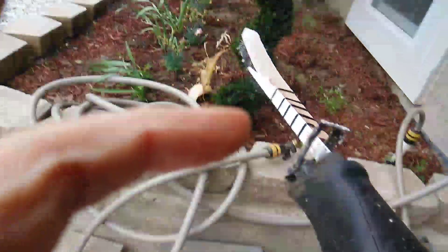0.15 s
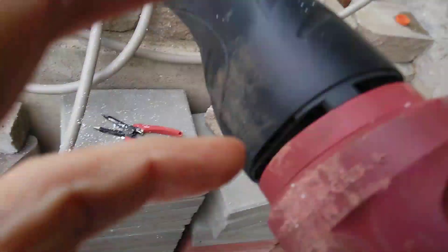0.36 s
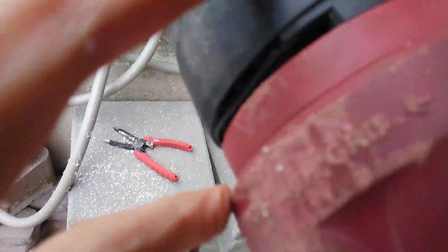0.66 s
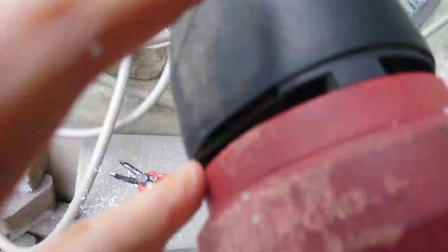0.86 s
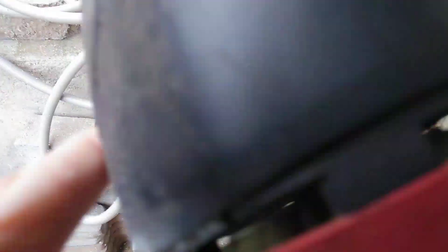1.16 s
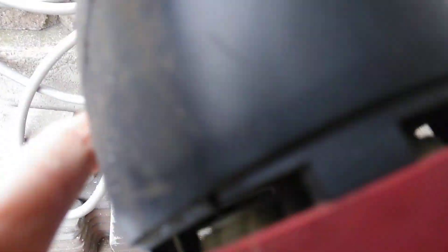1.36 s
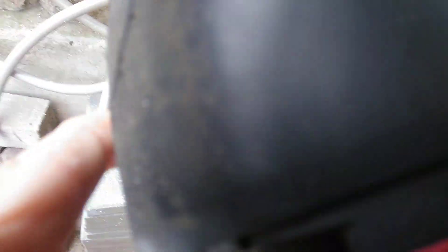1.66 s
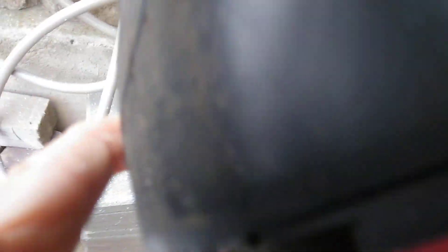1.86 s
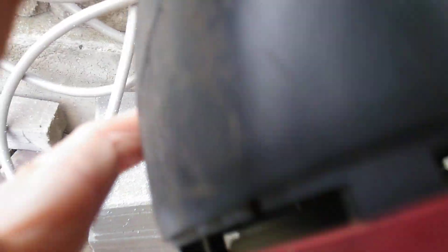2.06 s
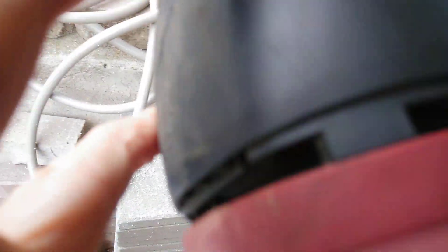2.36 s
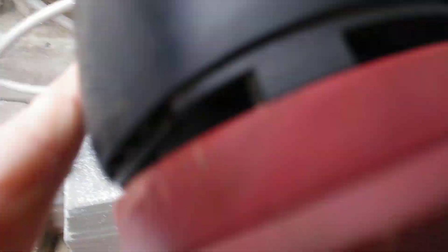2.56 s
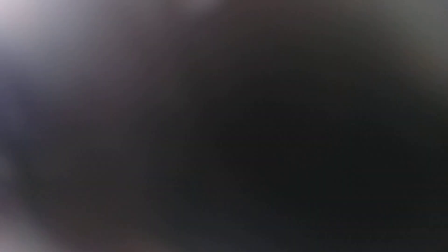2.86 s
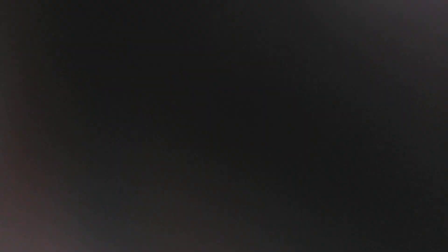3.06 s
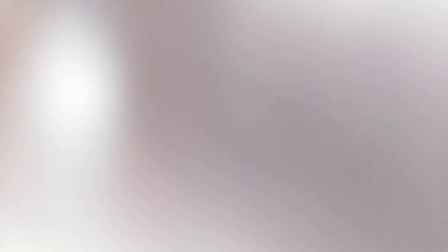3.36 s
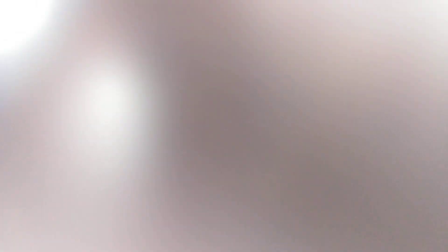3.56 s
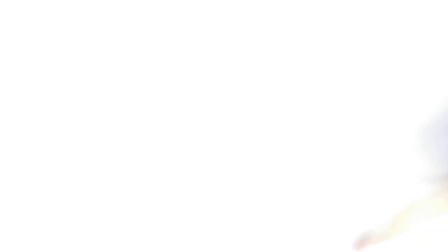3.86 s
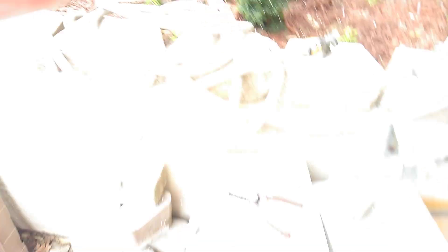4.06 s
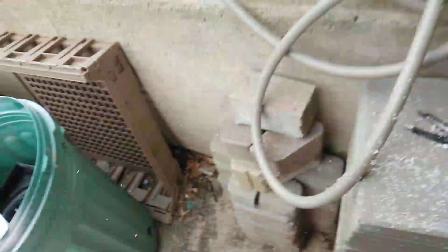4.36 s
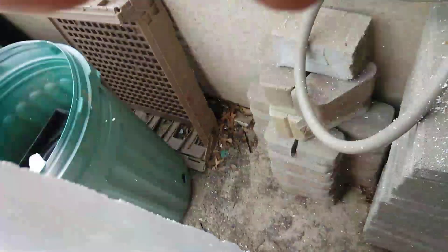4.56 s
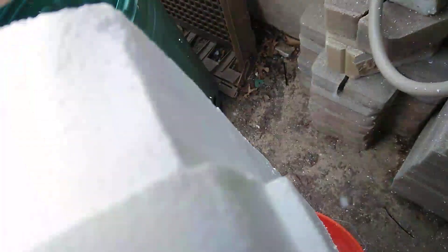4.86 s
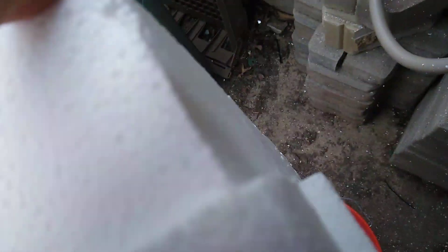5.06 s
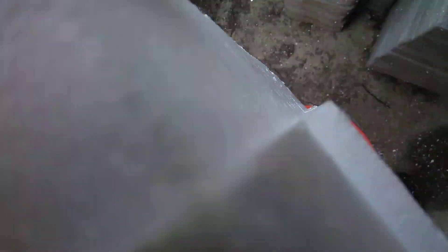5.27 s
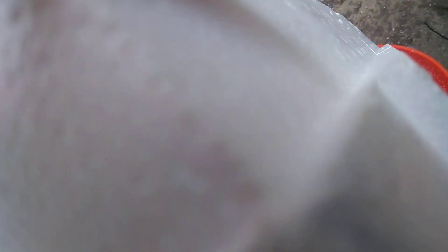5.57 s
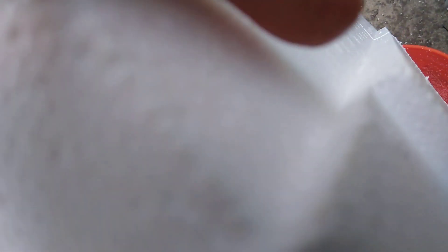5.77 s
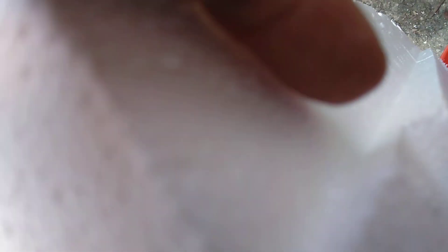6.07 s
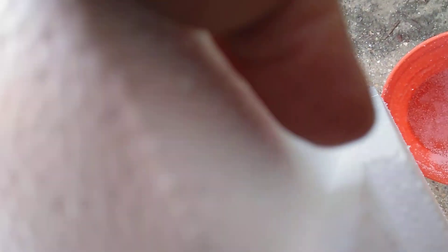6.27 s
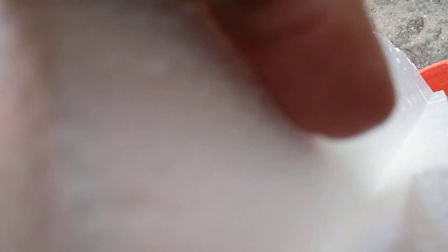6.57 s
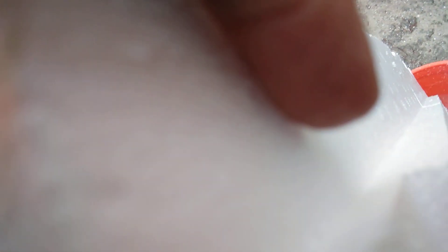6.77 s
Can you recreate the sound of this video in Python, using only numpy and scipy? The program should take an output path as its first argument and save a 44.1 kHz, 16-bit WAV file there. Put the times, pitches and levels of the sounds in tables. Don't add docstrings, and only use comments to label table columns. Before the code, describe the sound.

Close handling scrapes and hard plastic clicks, then a reciprocating saw spins up and runs steadily, harsh and buzzing, with low air thumps.

```python
import sys
import numpy as np
from scipy import signal
from scipy.fft import rfft, irfft
from scipy.io import wavfile
from scipy.ndimage import uniform_filter1d

SR = 44100
rng = np.random.default_rng(int(sys.argv[2]) if len(sys.argv) > 2 else 0)


def persist_wave(psi):
    counts = np.round(np.clip(psi, -1, 1) * 32767).astype(np.int16)
    wavfile.write(sys.argv[1], SR, np.atleast_2d(counts).T)


def convert_level_to_amplitude(level_db):
    exponent = np.asarray(level_db, float) / 20
    return 10 ** exponent


N = 305613
START_S = 1.698

# time_s, closeness_db, aim_left_minus_right_db, turned_away_0_to_1, low_rattle_past_hand_db
CAMERA_POSE = [(1.7, -12, -2.5, 0.56, 3.5), (1.85, -10.5, -5, 0.38, -2.5), (2.05, -9, -4, 0.29, -2),
               (2.3, -7.5, -3.5, 0.41, -7.5), (2.85, -7.5, -3, 0.02, -3.5), (3.2, -6, -4, 0.08, 1.5),
               (3.75, -6.5, -2, 0.12, 0.5), (3.95, -7, -3.5, 0.29, -9), (4.2, -7.5, 7, 0.91, -4),
               (4.45, -10, 0.5, 0.83, -9), (4.8, -10.5, -2.5, 1, -9), (5.15, -10, -1.5, 1, -3.5),
               (5.4, -10, -1.5, 1, 2), (5.8, -10.5, 2, 0.99, 0), (6.15, -10.5, 1.5, 1, 0.5),
               (6.5, -10, -0.5, 1, 1.5), (6.65, -11, 0, 0.8, 3.5), (6.93, -9.5, -3.5, 1, 3.5)]


def evened(x):
    return x / np.sqrt(np.mean(x ** 2, -1, keepdims=True) + 1e-20)


def curves(rows, t):
    s, *columns = np.transpose(rows)
    return np.array([np.interp(t, s, c) for c in columns])


def colours(rows, hz):
    f, *columns = np.transpose(rows)
    return np.array([np.interp(np.log(hz + 1), np.log(f), c) for c in columns])


def band(x, lo_hz, hi_hz, order=2):
    sos = signal.butter(order, [lo_hz, hi_hz], "bandpass", fs=SR, output="sos")
    return evened(signal.sosfilt(sos, x))


def drift(per_s, count):
    steps = np.arange(int(N / SR * 200) + 2)
    noise = uniform_filter1d(rng.standard_normal((count, len(steps))), 3)
    z = evened(uniform_filter1d(noise, max(int(200 / per_s), 1)))
    return np.array([np.interp(np.arange(N) * 200 / SR, steps, row) for row in z])


def ports(db, pan_db):
    return convert_level_to_amplitude(db + np.array([[min(pan_db, 0)], [-max(pan_db, 0)]]))


def swells(rows, rest_db=-120, order=4):
    t, power = np.arange(0, N + 64, 64) / SR, 0
    for s, length, db, pan_db in rows:
        power = power + (ports(db, pan_db) * np.exp(-abs(2 * (t - s) / length) ** order)) ** 2
    return np.repeat(np.sqrt(power + convert_level_to_amplitude(rest_db) ** 2), 64, axis=1)[:, :N]


def yard_floor():
    air = convert_level_to_amplitude(-81) * band(rng.standard_normal((2, N)), 40, 12000, order=1)
    leaves = band(rng.standard_normal((2, N)), 1800, 11500)
    return air + convert_level_to_amplitude(-79) * convert_level_to_amplitude(3 * drift(per_s=8, count=2)) * leaves


def handling():
    # frequency_hz, left_db_per_hz, right_db_per_hz
    rub_colour = [(200, -47, -24), (600, -40, -37), (950, -38, -36), (1250, -54, -36.5), (1700, -44, -40),
                  (2200, -54, -45), (2750, -57, -43), (4000, -51, -41.5), (5040, -56, -44),
                  (5900, -61, -49), (7700, -44, -54), (9000, -61, -69), (11300, -66, -74),
                  (13000, -79, -80)]
    # from_hz, to_hz, level_db
    sleeve_folds = [(2440, 2950, -3), (2940, 4800, 2), (1100, 2300, -13), (5200, 9000, -15)]
    # middle_s, length_s, level_db,
    # left_minus_right_db
    rub_strokes = [(0.0, .16, -68, -14), (.15, .12, -72, -12), (.3, 0.18, -57, -12),
                   (.44, 0.065, -47.5, -22), (.67, 0.22, -58.5, -24), (.83, .03, -51, -24),
                   (.87, .08, -56, -24), (.98, 0.12, -47, -16), (1.13, 0.21, -43, -6.5),
                   (1.25, 0.066, -43, 5), (1.36, 0.16, -45, -6), (1.46, 0.091, -65, -10),
                   (1.53, 0.04, -51.5, -13), (1.62, 0.12, -56, -14), (1.675, 0.04, -46, -18),
                   (1.695, 0.018, -25, -10)]
    # middle_s, length_s, level_db, left_minus_right_db
    touch_hisses = [
        (.12, .03, -64, 20),
        (.28, 0.2, -62, 20),
        (.56, .02, -70, 20),
        (1.14, 0.18, -57, 20),
        (1.33, 0.17, -58, 20),
        (1.68, .04, -66, 20),
    ]
    # middle_s, length_s, level_db, left_minus_right_db
    palm_hollow = [
        (1.5, .12, -61, -14),
        (1.56, .08, -68, -14),
    ]
    # middle_s, length_s, level_db, left_minus_right_db
    grip_rumbles = [
        (.88, .08, -68, -3),
        (.97, 0.078, -36, -24),
        (1.1, 0.099, -50, -17),
        (1.24, 0.18, -66, 0),
        (1.39, 0.14, -62, 8),
        (1.68, .05, -62, 0),
    ]
    t = np.arange(N) / SR
    hz = np.fft.rfftfreq(N, 1 / SR)
    slips = rng.standard_normal((5, N)) * convert_level_to_amplitude(3.3 * drift(per_s=45, count=5))
    low_cut = (hz ** 2 / (hz ** 2 + 450 ** 2)) ** 2
    rub = evened(irfft(rfft(slips[:2]) * convert_level_to_amplitude(colours(rub_colour, hz)) * low_cut, N))
    sleeve = evened(sum(convert_level_to_amplitude(db) * band(slips[:2], lo_hz, hi_hz) for lo_hz, hi_hz, db in sleeve_folds))
    landed = np.clip(np.minimum((t - .88) / .04, (1.6 - t) / .04), .25, 1)
    landed = landed + .85 * np.exp(-((t - .44) / .024) ** 2)
    out = (landed * rub + (1 - landed) * sleeve) * swells(rub_strokes, -84, order=2)
    out += swells(touch_hisses, -90, order=2) * band(slips[2], 9000, 12000)
    out += swells(palm_hollow, order=2) * band(slips[3:], 730, 960)
    out += swells(grip_rumbles, [[-84], [-78]]) * band(slips[3:], 45, 144)
    return out * (t < START_S + .01)


def clicks():
    # start_s, peak_db, own_ring_hz, ring_time_factor, left_minus_right_db
    snap_events = [(0.927, -37, 2540, 0.86, -7), (0.972, -39, 3930, 0.95, -12),
                   (1.004, -37, 1900, 0.95, -7.5), (1.076, -5.5, 1880, 1, -7), (1.143, -28, 660, 0.81, -5),
                   (1.158, -42, 5200, .7, -5), (1.189, -27.5, 1440, 0.79, -6), (1.234, -26, 1430, 0.68, -7),
                   (1.253, -18.5, 4500, 0.76, -1), (1.3, -2.5, 1870, 1, -8), (1.338, -23.5, 1300, 0.86, -1),
                   (1.409, -31.5, 1660, 0.77, -4), (1.523, -45, 1320, 0.94, -17),
                   (1.649, -41, 1310, 0.95, -10), (1.665, -35, 2880, 0.95, -9), (1.699, 5, 1790, 0.94, -6)]
    # frequency_hz, level_db, t60_s
    shell_modes = [(1320, -13.5, .03), (1850, -15, 0.022), (2340, -27, 0.0063), (2580, -18, 0.022),
                   (3030, -1.5, 0.0034), (4500, 2, 0.0015), (5060, -18, 0.0068), (5900, -38, .011)]
    out, t = np.zeros((2, N + 4000)), np.arange(4000) / SR
    chance = rng.standard_normal((len(snap_events), 2, 4000))
    for (s, db, hz, longer, pan_db), noise in zip(snap_events, chance):
        ring = sum(convert_level_to_amplitude(mode_db - 60 * t / (t60 * longer)) * np.sin(2 * np.pi * f * t)
                   for f, mode_db, t60 in shell_modes + [(hz, -4, .013)])
        scrape = noise * np.exp(-t / (.0012 * convert_level_to_amplitude(-.3 * db)))
        crack = band(noise, 1300, 6000 + 6000 * min(convert_level_to_amplitude(0.46 * db), 1))
        crack = crack * convert_level_to_amplitude(np.array([[-6], [-9]]) - 60 * t / (0.0095 * longer))
        tail = band(noise[::-1], 700, 6000) * convert_level_to_amplitude(-26 - 60 * t / .07)
        snap = band(signal.fftconvolve(scrape, ring[None], axes=1)[:, :4000], 1280, 14600)
        snap = snap / abs(snap).max(1, keepdims=True) + crack + tail
        start = round(s * SR)
        out[:, start:start + 4000] += snap * convert_level_to_amplitude(db - 2.0 + np.array([[pan_db / 2], [-pan_db / 2]]))
    return out[:, :N]


def thumps():
    # start_s, peak_db, pitch_hz, t60_s, left_minus_right_db
    pushes = [(0.927, -17.5, 113, 0.077, -33), (0.972, -37, 130, 0.089, -18), (1.049, -38, 110, 0.092, -20),
              (1.142, -6.5, 450, 0.01, -5), (3.524, -2.5, 118, 0.11, 30), (4.481, -3.5, 105, 0.086, 30),
              (5.891, -9, 124, 0.077, 30), (6.205, -12, 91, .14, 30), (6.301, -10, 99, 0.11, 30),
              (6.51, -11, 151, 0.15, 30), (6.604, -3, 112, 0.16, 34), (6.722, -8, 131, 0.16, 30),
              (6.866, -6.5, 86, 0.1, 30)]
    out, t = np.zeros((2, N + 8000)), np.arange(8000) / SR
    for s, db, hz, t60, pan_db in pushes:
        push = convert_level_to_amplitude(-60 * t / t60) * np.sin(2 * np.pi * hz * t * (1 - 0.44 * t)) * (1 - np.exp(-t / 0.0065))
        start = round(s * SR)
        out[:, start:start + 8000] += ports(db, pan_db) * push
    return out[:, :N]


def repeating(t, stroke_turns):
    # multiple_of_stroke_rate, level_against_chance_impacts_db
    repeat_colour = [(4, -10.5), (14, -11), (30, -16), (38, -7.5), (48, -4.5), (56, -12.5), (82, -6),
                     (90, -9.5), (98, -11.5), (140, -14), (170, -22)]
    odd_db = -3
    k = np.arange(513)
    multiple, db = np.transpose(repeat_colour)
    phases = np.exp(2j * np.pi * rng.random((2, 513)))
    lines = convert_level_to_amplitude(np.interp(k, multiple, db) + odd_db * (k % 2)) * phases
    cycle = irfft(lines, 8192) * 8 * 32
    locked = 1 / (1 + np.exp(-(t - 3.4) / 0.22))
    return cycle[:, (stroke_turns % 1 * 8192).astype(int)] * locked * convert_level_to_amplitude(2.5 * drift(per_s=4, count=2))


def blend(near, far, turned):
    return near[..., None] * (1 - turned) + far[..., None] * turned


def port_likeness(hz, turned):
    # frequency_hz, likeness_at_vents_0_to_1, likeness_turned_away_0_to_1
    likeness = [(110, .1, .3), (380, .1, .85), (800, .2, .8), (1200, .65, .7), (1800, .7, .6),
                (2300, .3, .3), (4400, .25, .2), (8000, .1, .1)]
    lead_near = np.minimum(2 * np.pi * .0009 * (hz - 1450), 2 * np.pi)
    lead_far = np.minimum(2 * np.pi * -.0007 * (hz - 1300), 2.4)
    near, far = colours(likeness, hz) * np.exp(1j * np.array([lead_near, lead_far]))
    return blend(near, far, turned)


def housing_colour(hz, turned, hand_db):
    # frequency_hz, left_db_per_hz, right_db_per_hz
    near_colour = [(211, -11.5, 4.5), (607, -5.5, -7), (883, -3, 1.5), (1300, -4.5, 0), (1870, -3.5, 4),
                   (2470, -6.5, -2.5), (2800, -4, -3), (3550, -3, -0.5), (5200, -2.5, -1), (6000, -9, -4),
                   (7970, -5, -9), (9700, -10, -10.5), (10960, -13, -11.5), (13500, -25.5, -16)]
    # frequency_hz, left_db_per_hz, right_db_per_hz
    far_colour = [(201, -18.5, -21.5), (634, -9.5, -11.5), (920, -8, -10), (1060, -7, -3.5),
                  (1840, -6.5, 0), (2410, -7, -5.5), (2800, -4.5, -5), (3330, -4, -2.5), (5600, -6.5, -3),
                  (6050, -4.5, -1.5), (7550, -3.5, -16.5), (9100, -6.5, -26), (11760, -9, -34),
                  (13400, -17, -23)]
    # frequency_hz, width_hz, at_vents_db, turned_away_db
    housing_modes = [(880, 110, 4, 2), (1200, 130, 3, 2), (1660, 170, 7, 3.5), (2780, 150, 6, 1.5),
                     (3330, 220, -2, -1.5), (3950, 260, 4.5, 1.5), (5900, 500, -3, -5.5),
                     (8800, 700, -3, -1.5), (13100, 2200, 1.5, -6)]
    rings = sum(np.outer([near_db, far_db], 1 / (1 + (2 * (hz - f) / width) ** 2))
                for f, width, near_db, far_db in housing_modes)
    colour = convert_level_to_amplitude(blend(colours(near_colour, hz) + rings[0], colours(far_colour, hz) + rings[1], turned))
    shaded = np.exp(-np.log(hz[:, None] / 1300 + 1e-3) ** 2 / 0.14)
    colour *= convert_level_to_amplitude(shaded * np.outer([0.18, 1], hand_db)[:, None])
    middle = (hz > 900) & (hz < 6000)
    return colour / np.sqrt((colour[:, middle] ** 2).sum(1, keepdims=True) / len(hz))


def vent_hiss_db(hz, frames, turned, hand_db):
    # middle_s, length_s, frequency_hz, width_hz, level_db
    passing = [(4.43, 1, 2080, 680, 3.5), (4.78, 0.91, 13400, 3400, -6), (4.57, .6, 11600, 1600, -2),
               (3.98, 0.47, 6140, 2100, -3), (3.3, 0.51, 3050, 1200, -2), (4.63, 0.55, 1350, 440, -3.5),
               (6.62, 0.48, 2800, 660, -1), (5.54, 1, 1510, 500, -2), (3.45, 0.37, 2200, 550, 4.5),
               (2.06, 0.43, 3050, 1500, 2), (4.55, 0.32, 3400, 720, -2.5), (5.7, 0.36, 1860, 200, -13)]
    jet = np.exp(-((frames - 4.21) / 0.047) ** 2)
    hiss_db = 2 * (1 - turned) + 0 * turned + np.outer([2, -18], jet)[:, None]
    hz = hz[:, None]
    slow_db = 13.5 * np.exp(-np.abs(frames - START_S) / 0.11)
    db = np.clip((hz - 5500) / 2500, 0, 1) * hiss_db - np.clip((hz - 2500) / 2500, 0, 1) * slow_db
    db = db + np.exp(-((hz - 11000) / 1800) ** 2) * 0.46 * hand_db * turned ** 2
    return db + sum(level_db * np.exp(-(2 * (hz - f) / wide_hz) ** 2 - (2 * (frames - s) / length) ** 4)
                    for s, length, f, wide_hz, level_db in passing)


def rattle(t, stroke_turns):
    beat = 0.04 * (1 + 3 * np.exp(-abs(t - START_S) / 0.097))
    swell = 1 + beat * np.cos(4 * np.pi * stroke_turns) + 0.026 * np.cos(2 * np.pi * stroke_turns)
    impacts = rng.standard_normal((2, N)) * swell * convert_level_to_amplitude(0.5 * drift(per_s=70, count=2))
    impacts = impacts + repeating(t, stroke_turns)
    hz, frames, z = signal.stft(impacts, SR, nperseg=1024, noverlap=768)
    close_db, aim_db, turned, hand_db = curves(CAMERA_POSE, frames)
    turned = np.clip(turned, 0, 1)
    same = port_likeness(hz, turned)
    z[1] = same * z[0] + np.sqrt(1 - abs(same) ** 2) * z[1]
    patches = evened(uniform_filter1d(uniform_filter1d(rng.standard_normal(z.shape), 7, 1), 10, 2))
    echoes = evened(uniform_filter1d(uniform_filter1d(rng.standard_normal(z.shape), 12, 1), 70, 2))
    overload_db = np.outer([1.2, 4.5], 1 - turned)
    level_db = close_db + np.outer([.5, -.5], aim_db) + overload_db
    low_cut = hz[:, None] ** 2 / (hz[:, None] ** 2 + 150 ** 2)
    treble_db = vent_hiss_db(hz, frames, turned, hand_db)
    z *= housing_colour(hz, turned, hand_db) * low_cut
    z *= convert_level_to_amplitude(level_db[:, None] + treble_db + patches + 1.3 * echoes)
    return signal.istft(z, SR, nperseg=1024, noverlap=768)[1][:, :N]


def tone(cycles):
    return np.sqrt(2) * np.sin(2 * np.pi * (cycles + rng.random((2, 1))))


def whine(turns):
    # middle_s, length_s, level_db, left_minus_right_db
    fan_whine_swells = [
        (1.82, .12, -10, -8),
                        (2.15, .2, -29, -10), (2.45, 0.52, -33, 6), (2.9, 0.4, -16, 13), (3.2, 0.24, -13, 5),
                  (3.5, 0.33, -10, -5), (3.67, .2, -17, -5), (3.857, 0.13, -8, 11), (4.0, 0.23, -21, -2),
                  (4.22, 0.4, -8, 13), (4.693, 0.49, -14, 1), (4.997, 0.3, -12, -13), (5.35, 0.72, -15, 6),
                  (5.97, 0.12, -28, 4), (6.11, 0.16, -11, -13), (6.6, 0.63, -14, -24)]
    # middle_s, length_s, level_db, left_minus_right_db
    commutator_swells = [
        (2.4, 0.65, -19, 16),
        (2.97, 0.15, -21, 14),
        (3.4, .45, -14, 16),
        (3.8, .2, -19, 14),
        (4.15, 0.39, -11.5, 30),
        (5.6, .3, -20, 31),
        (5.88, 0.3, -25, 30),
        (6.12, 0.16, -12.5, 37),
        (6.55, .15, -16, 45),
        (6.85, 0.24, -15.5, 35),
    ]
    fan = swells(fan_whine_swells, -29) * convert_level_to_amplitude(-5) * tone(12 * turns)
    return fan + swells(commutator_swells, -58) * convert_level_to_amplitude(-5) * tone(24 * turns)


def saw():
    # multiple_of_shaft_speed, left_db, right_db
    shaft_orders = [(1, -43.5, -51), (7, -51, -45), (10, -25, -38), (36, -53, -62)]
    # multiple_of_stroke_rate, level_db
    stroke_knocks = [(2, -57), (3, -57), (5, -49), (6, -44), (7, -51), (8, -51), (10, -59), (11, -61),
                     (12, -49), (18, -52), (20, -50), (24, -68), (25, -54), (37, -51), (40, -47),
                     (44, -29.5), (46, -34)]
    t = np.arange(N) / SR
    since = abs(t - START_S)
    lag_hz = 50 * np.exp(-since / .55) + 227.8 * np.exp(-since / .2407)
    sag_hz = 1.7 * np.maximum(t - 5.85, 0)
    shaft_hz = 397.75 - lag_hz - sag_hz
    turns = np.cumsum(shaft_hz * (1 + 0.001127 * drift(per_s=21, count=1)[0])) / SR
    stroke = turns / 9.2
    orders = sum(convert_level_to_amplitude(np.array([[l_db], [r_db]])) * tone(k * turns) for k, l_db, r_db in shaft_orders)
    orders = orders * (shaft_hz / 397) ** 3 * convert_level_to_amplitude(2.3 * drift(per_s=15.0, count=2))
    waver = convert_level_to_amplitude(2.6 * drift(per_s=60, count=2) + 3 * drift(per_s=14, count=2) - 1)
    knocks = sum(convert_level_to_amplitude(db) * tone(k * stroke) for k, db in stroke_knocks)
    knocks = knocks * convert_level_to_amplitude(4.87 * drift(per_s=8, count=1)) * np.array([[1], [.7]])
    body = rattle(t, stroke) + (whine(turns) + orders) * waver + knocks
    return body * np.clip((t - START_S) / 0.0074, 0, 1)


def cooling_air():
    # middle_s, length_s, level_db, left_minus_right_db
    gusts = [
        (3.4, 0.061, -24, -19),
        (3.75, 0.068, -23, -10),
        (3.85, 0.12, -23, -21),
        (4.2, 0.21, -22.5, 16),
        (4.6, 0.165, -24.5, 22),
        (6.26, 0.15, -23.5, 22),
        (6.42, .06, -26, 16),
        (6.57, 0.17, -18.5, 29),
        (6.72, 0.12, -13, 28),
        (6.9, 0.15, -25, 7),
    ]
    t = np.arange(N) / SR
    turned = np.clip(curves(CAMERA_POSE, t)[2], 0, 1) ** 2
    creep_db = np.outer([10, 1], t - START_S)
    near_db = np.array([[-55], [-26]]) + creep_db - 12 * np.exp(-abs(t - START_S) / 0.05)
    steady_db = near_db * (1 - turned) + np.outer([-41, -48], turned)
    lumps = convert_level_to_amplitude(2.2 * drift(per_s=30, count=2))
    buffeting = evened(band(rng.standard_normal((2, N)), 52.0, 217) * lumps)
    return np.hypot(convert_level_to_amplitude(steady_db), swells(gusts)) * buffeting * (t > START_S)


def scene():
    return yard_floor() + handling() + clicks() + thumps() + saw() + cooling_air()


def thin_out(x):
    hz, frames, z = signal.stft(x, SR, nperseg=2048, noverlap=1536)
    column = hz[:, None]

    def paired(v):
        return np.where(column < 6500, np.array([v[0] + v[1], v[0] - v[1]]) / np.sqrt(2), v)

    z = paired(z)
    fine_db = 10 * np.log10(uniform_filter1d(abs(z) ** 2, 5, 1) + 1e-16)
    around_db = uniform_filter1d(fine_db, 80, 1)
    valley_db = np.interp(hz, [600, 2000, 5000, 8000, 12000], [-40, -5, -3, .5, 1.5])[:, None]
    uneven_db = np.clip(abs(around_db[0] - around_db[1]) - 5, 0, 6)
    valley_db = valley_db - uneven_db * (column > 6500) * (column < 11500)
    below_loudest_db = np.interp(hz, [600, 3000, 7000], [-70, -22, -19])[:, None]
    masked_db = around_db.max(1, keepdims=True) + below_loudest_db
    silence_db = np.interp(hz, [300, 900], [-120, -112])[:, None]
    limit_db = np.maximum(np.maximum(around_db + valley_db, masked_db), silence_db)
    z *= convert_level_to_amplitude(-24 * np.clip((limit_db - fine_db) / 1.5 + .5, 0, 1))
    return signal.istft(paired(z), SR, nperseg=2048, noverlap=1536)[1][:, :N]


def roll_off(x):
    return signal.sosfilt(signal.butter(12, 15740, fs=SR, output="sos"), x)


def record(dry):
    ceiling = convert_level_to_amplitude(-0.53)
    mix = thin_out(np.clip(dry, -ceiling, ceiling))
    return roll_off(mix)


dry = scene()
out = record(dry)
persist_wave(out)
```